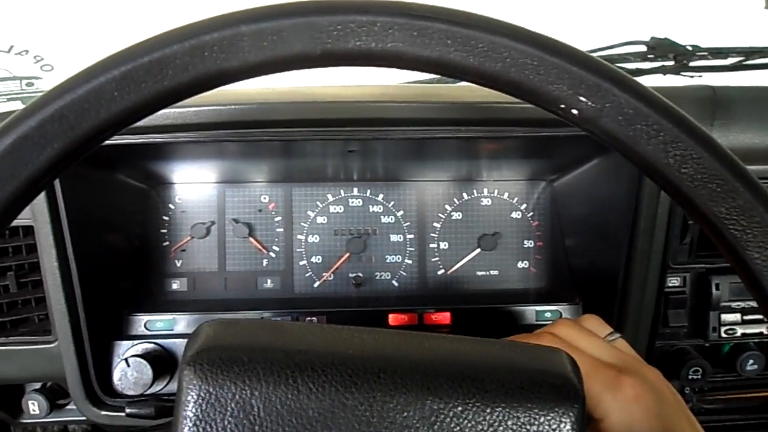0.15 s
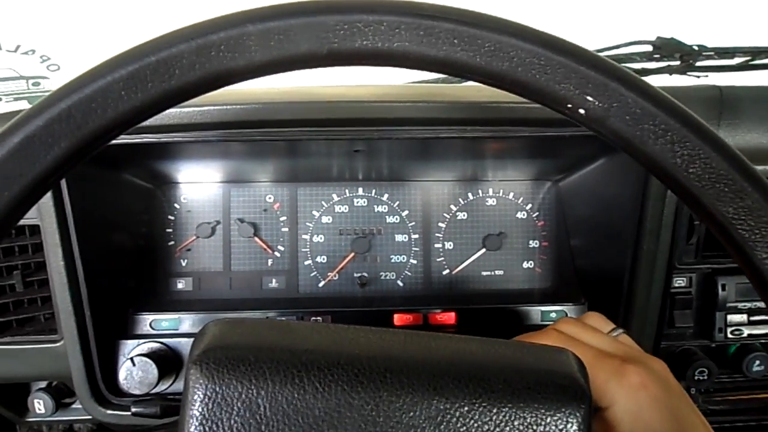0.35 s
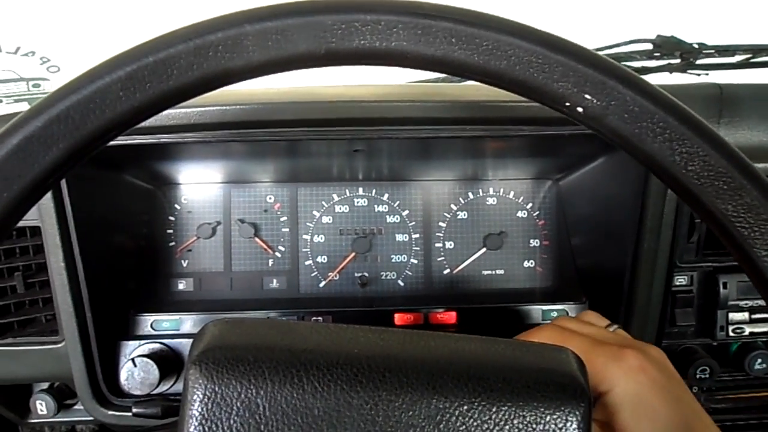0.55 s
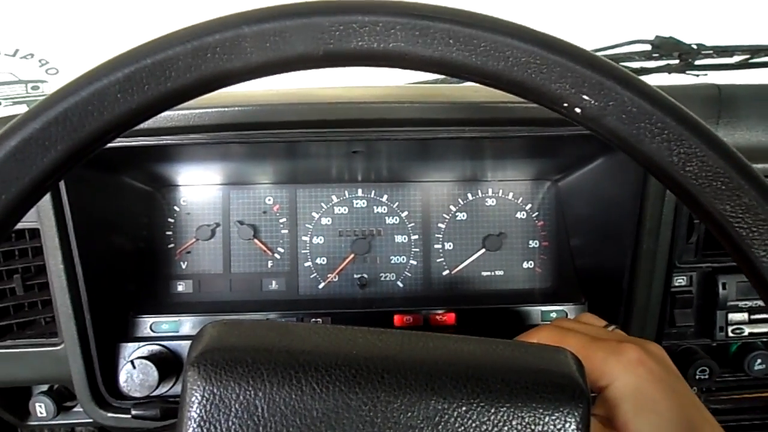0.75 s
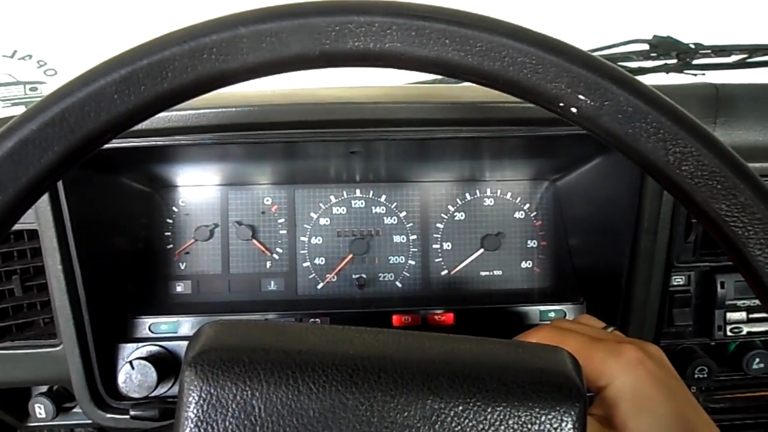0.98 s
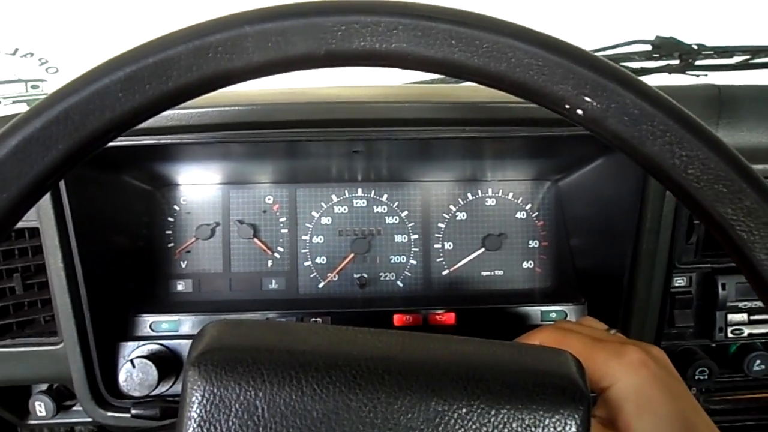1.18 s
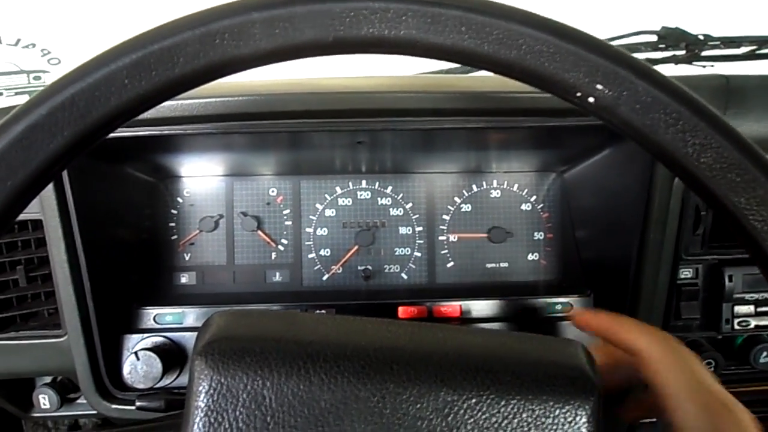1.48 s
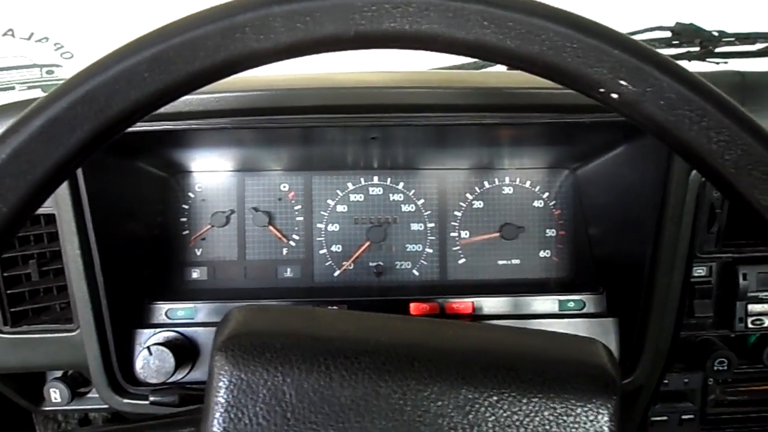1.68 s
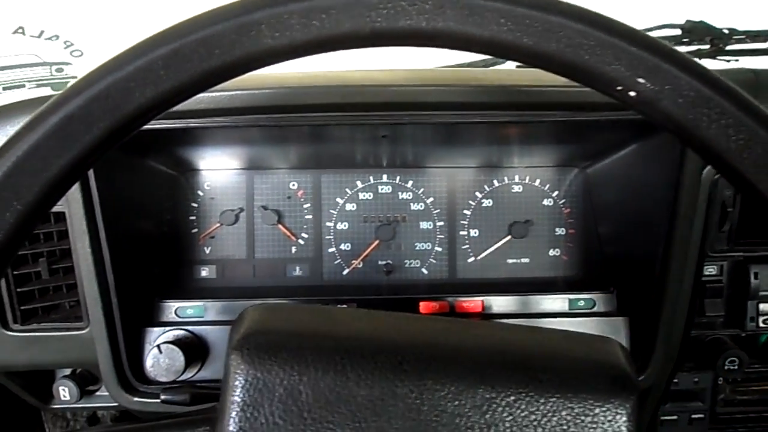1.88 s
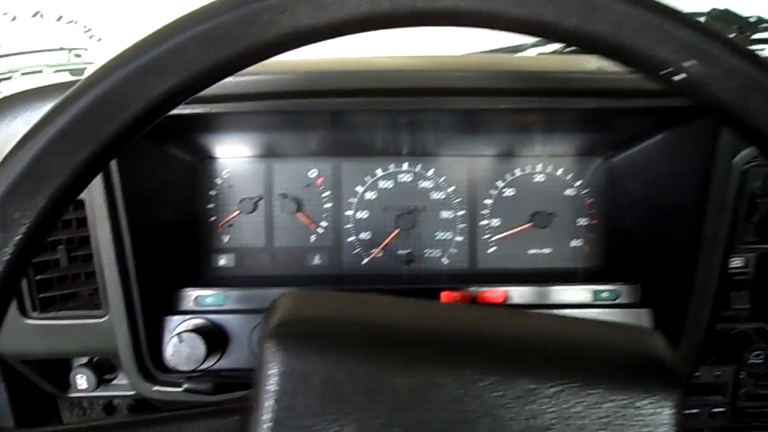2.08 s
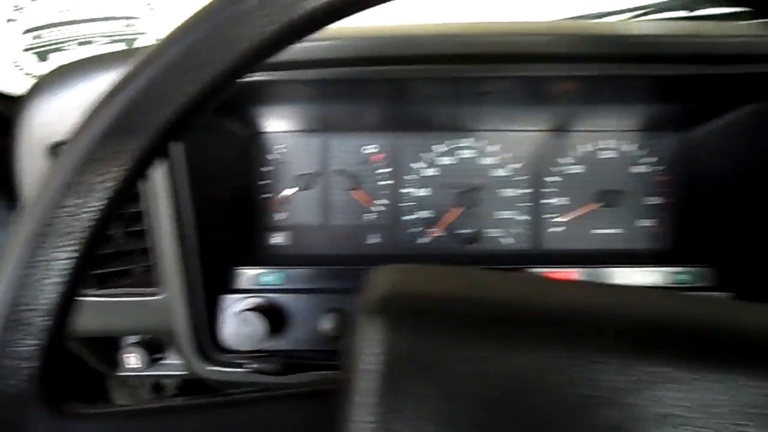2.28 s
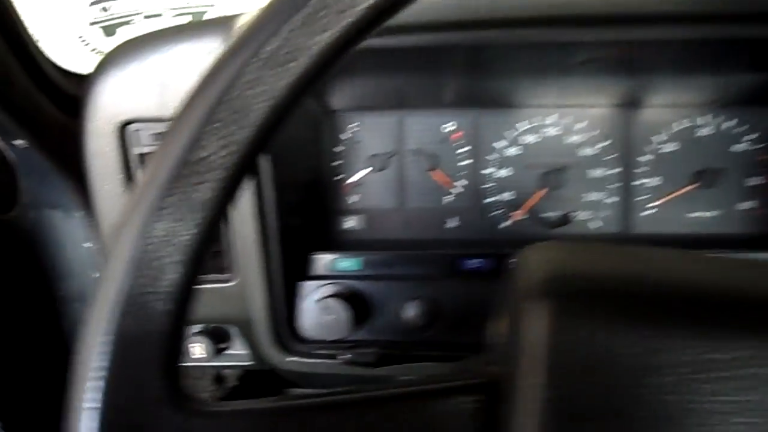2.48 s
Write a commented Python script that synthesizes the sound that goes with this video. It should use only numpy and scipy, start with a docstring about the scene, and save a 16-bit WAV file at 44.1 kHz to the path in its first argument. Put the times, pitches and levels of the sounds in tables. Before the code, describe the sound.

Loud open-exhaust car engine start from the driver's seat: key click, starter grind, deep rumbling roar

```python
"""A big six-cylinder engine with no exhaust is started, heard from the driver's seat.
A hand stirs and the key clicks (coloured noise); a pump whines (narrow bands of noise); the starter
slams in and grinds (noise gated by gear teeth, ringing the flywheel), a solenoid clacks, the motor groans
(a sagging sine). The engine catches with a roar: firing impulses excite the boom of the cabin, and gas
hisses in puffs. It settles into a booming idle that surges twice, each time with a rush of gas."""
import sys
import numpy as np
from scipy import signal
from scipy.fft import rfft, irfft
from scipy.io import wavfile
from scipy.ndimage import uniform_filter1d

SR = 44100
rng = np.random.default_rng(int(sys.argv[2]) if len(sys.argv) > 2 else 0)


def store_pcm(level_fs):
    """Save levels as 16-bit WAV."""
    pcm = np.round(np.clip(level_fs, -1, 1) * 32767).astype(np.int16)
    wavfile.write(sys.argv[1], SR, np.atleast_2d(pcm).T)


N = 116865
t = np.arange(N) / SR


def amp(db):
    """Logarithmic level: decibels to amplitude gain."""
    return 10 ** (np.asarray(db) / 20)


def unit(x):
    """Normalisation: scale to rms 1."""
    return x / np.sqrt(np.mean(x ** 2))


def curve(table, axis=1):
    """Linear interpolation: one column of a table against time."""
    rows = np.array(table, float)
    return np.interp(t, rows[:, 0], rows[:, axis])


def fader(table, axis=1):
    """Envelope: gain from a level column, opening over the 10 ms before its first row."""
    opening = np.clip((t - table[0][0]) * 100 + 1, 0, 1)
    return amp(curve(table, axis=axis)) * opening


def noise():
    """White noise: equal mean power at all frequencies."""
    return rng.standard_normal(N)


def walk(hz):
    """Low-pass chance: noise averaged twice over 1/hz seconds, at rms 1."""
    size = max(int(SR / hz), 1)
    once = uniform_filter1d(noise(), size, mode="wrap")
    return unit(uniform_filter1d(once, size, mode="wrap"))


def colour(x, points):
    """Spectral shaping: weight each frequency, falling off below the first point, at rms 1."""
    hz, db = np.array(points, float).T
    f = np.maximum(np.fft.rfftfreq(N, 1 / SR), 1)
    gain = amp(np.interp(np.log(f), np.log(hz), db))
    bass_cut = np.minimum(f / hz[0], 1) ** 2
    return unit(irfft(rfft(x) * gain * bass_cut, N))


def ring(x, modes):
    """Modal superposition: a sum of second-order resonances."""
    return sum(amp(db) * signal.lfilter(*signal.iirpeak(hz, hz / width, SR), x) for hz, width, db in modes)


def smear(x, decay_s):
    """Exponential relaxation: each impulse becomes a puff that dies away."""
    return signal.lfilter([1], [1, -np.exp(-1 / (decay_s * SR))], x)


# engine speed: t/s, firing rate/(1/s)
FIRING_RATE = [(1.16,34.6),(1.3,35),(1.35,51.5),(1.44,51.5),(1.55,66),(1.64,64.3),(1.81,70.4),(1.95,54.6),(2.13,70),(2.22,65.3),(2.3,67),(2.39,57),(2.5,84),(2.65,64)]
# force of the firings: t/s, level/dB, lead of one cylinder bank over the other/dB
FIRING_FORCE = [(1.16,-25,1),(1.2,-18.5,-5),(1.34,-7.5,10.5),(1.42,-15.5,-13.5),(1.52,-26,13),(1.64,-20.5,-0.5),(1.8,-28,12.5),(1.98,-20,15),(2.09,-22,-1.5),(2.19,-26.5,6),(2.29,-29.5,17),(2.38,-22.5,21),(2.46,-24,5.5),(2.54,-23,6),(2.65,-24.5,9)]
FIRING_SCATTER_DB, TIMING_SCATTER_S = 2.9, 0.0011


def firings():
    """Pulse train: one impulse per firing; the two banks alternate, unevenly under load."""
    rate = curve(FIRING_RATE)
    turns = np.cumsum(rate * (t > FIRING_RATE[0][0])) / SR
    at = np.flatnonzero(np.diff(np.ceil(turns)) > 0)
    chance = rng.standard_normal((len(at), 2))
    bank_db = (-1) ** np.arange(len(at)) * curve(FIRING_FORCE, axis=2)[at] / 2
    size = amp(bank_db + FIRING_SCATTER_DB * chance[:, 0])
    shift = (TIMING_SCATTER_S * SR * chance[:, 1]).astype(int)
    return np.bincount(np.clip(at + shift, 0, N - 1), size, N)


# boom resonances of the cabin: f/Hz, bandwidth/Hz, relative level/dB
CABIN_MODES = [(29.8,10,-3),(58,36,4),(97.3,9,0.5),(140,37,-31.5),(220,43,-12.5),(363,27,-18)]
# gas from the open ports: t/s, hiss level/dB, roar level/dB (before the trims below)
GAS_FLOW = [(1.06,-80,-40),(1.085,-32,-51.5),(1.16,-34,-45),(1.21,-23,-33),(1.32,-26.5,-34),(1.4,-31,-37),(1.49,-43,-45),(1.62,-51.5,-50.5),(1.84,-61,-57.5),(1.86,-46,-52),(2.0,-37.5,-43),(2.14,-55,-52.5),(2.255,-57.5,-52.5),(2.277,-41.5,-52.5),(2.4,-36,-41),(2.5,-46,-48.5),(2.63,-56.5,-51)]
# spectrum of the gas hiss: f/Hz, relative level/dB
HISS_SPECTRUM = [(300,-16),(900,-1.5),(1500,-3),(2100,0),(2600,0),(3300,1),(3850,-1.5),(4400,-3),(5200,-2),(6200,0),(7300,-3),(9000,-4),(11000,-3),(13500,-8.5),(15500,-20)]
# spectrum of the gas roar, also of the rustle before the start: f/Hz, relative level/dB
ROAR_SPECTRUM = [(60,8),(130,9.5),(230,5),(320,-1),(380,7.5),(455,-1.5),(540,-2),(660,1),(760,-0.5),(850,1.5),(1000,-5.5),(1400,-6.5),(1900,-7.5),(2500,-11),(5000,-17),(11000,-28),(15500,-34)]
PUSH_S, BODY_LOW_HZ, BOOM_DB, RUMBLE_DB = 0.0033, 34, -0.5, -14
PUFF_S, ROAR_PUFF_DEPTH, HISS_PUFF_DEPTH = 0.011, 0.4, 0.2
ROAR_DB, HISS_DB, CRACKLE_DB, FLUTTER_DB = 6.5, -1, -0.5, 1.75


def engine():
    """Forced resonance and modulated turbulence: firings boom, gas puffs. Returns bass and gas."""
    pulses = firings()
    boom = ring(smear(smear(pulses, PUSH_S), PUSH_S), CABIN_MODES)
    boom = signal.sosfilt(signal.butter(2, BODY_LOW_HZ, "high", fs=SR, output="sos"), boom)
    # rms 1 over the running time only
    boom = unit(boom) * np.sqrt(np.mean(t > FIRING_RATE[0][0]))
    rumble = amp(RUMBLE_DB) * unit(ring(smear(noise(), PUSH_S), CABIN_MODES))
    bass = (boom + rumble) * fader(FIRING_FORCE) * amp(BOOM_DB)

    puff = smear(pulses, PUFF_S)
    roar = colour(noise() * (1 + ROAR_PUFF_DEPTH * puff), ROAR_SPECTRUM) * fader(GAS_FLOW, axis=2)
    crackle = amp(CRACKLE_DB * walk(1500))
    hiss = colour(noise() * (1 + HISS_PUFF_DEPTH * puff) * crackle, HISS_SPECTRUM) * fader(GAS_FLOW)
    flutter = amp(FLUTTER_DB * walk(49))
    return bass, amp(ROAR_DB) * roar + amp(HISS_DB) * hiss * flutter


# spectrum of the pinion's slam: f/Hz, relative level/dB
SLAM_SPECTRUM = [(24, -20), (40, -7), (126, -3), (197, -22), (317, -4), (438, -19), (548, -12.5),
                 (1100, -21.5), (1190, -9.5), (1380, -25), (2060, -17.5), (2710, -26), (7910, -27.5),
                 (10700, -24.5), (15500, -36)]
# spectrum of the grinding teeth: f/Hz, relative level/dB
GRIND_SPECTRUM = [(18, -32), (30, -12), (59, 0.5), (92, -14), (140, -10), (455, -20.5), (546, -19),
                  (996, -27), (2130, -27), (2360, -31.5), (2910, -26), (6720, -33.5), (15500, -52)]
# ring of starter gear and flywheel: f/Hz, bandwidth/Hz, relative level/dB
GEAR_MODES = [(1235,48,5.5),(2040,98,-4.5),(2860,74,-6),(3250,160,-7),(3560,270,1),(6350,400,-5.5),(7100,220,-18)]
# envelope of the cranking, for grind and gear whine: t/s, level/dB (before each trim)
CRANKING = [(.67,-99),(.7,-35),(.8,-30.5),(.86,-37),(.93,-34.5),(1.03,-43),(1.12,-38),(1.2,-51),(1.28,-75)]
# envelope of the rasp as the engine overruns the gear: t/s, level/dB (before its trim)
OVERRUN_LEVEL = [(1.07,-56),(1.09,-33),(1.16,-30),(1.2,-24.5),(1.32,-30),(1.42,-40),(1.5,-43.5)]
# broad resonances of that rasp: f/Hz, bandwidth/Hz, relative level/dB
RASP_MODES = [(1433,170,-11),(1995,200,-19),(2300,280,3.5),(3130,870,-19),(3650,1500,-2.5),(5000,1600,-15)]
SLAM_S, SLAM_ATTACK_S, SLAM_HOLD_S, SLAM_DECAY_S = 0.6746, 0.047, 0.023, 0.048
SLAM_DB, GRIND_DB, GEAR_DB, RASP_DB = -25, 2.5, -6.5, -2
# mean tooth rate; fade of each scrape as a share of a tooth period; unevenness
TEETH_HZ, TOOTH_DECAY, TOOTH_SCATTER_DB = 258.6, 1, 1.2


def starter():
    """Periodic excitation: the pinion slams in, teeth grind and ring the flywheel, then rasp in overrun."""
    age = t - SLAM_S
    rise = np.clip(age / SLAM_ATTACK_S, 0, 1)
    fall = np.exp(-np.maximum(age - SLAM_ATTACK_S - SLAM_HOLD_S, 0) / SLAM_DECAY_S)
    mesh = np.cumsum(TEETH_HZ * (1 + .15 * walk(40))) / SR
    teeth = np.exp(-(mesh % 1) / TOOTH_DECAY) * amp(TOOTH_SCATTER_DB * walk(190))
    slam = amp(SLAM_DB) * rise * fall * colour(noise() * teeth, SLAM_SPECTRUM)
    grind = amp(GRIND_DB) * colour(noise() * teeth, GRIND_SPECTRUM)
    gear = amp(GEAR_DB) * unit(ring(noise() * teeth, GEAR_MODES))
    rasp = amp(RASP_DB) * unit(ring(noise() * teeth, RASP_MODES))
    rasp = rasp * fader(OVERRUN_LEVEL) * (t < OVERRUN_LEVEL[-1][0])
    return slam + (grind + gear) * fader(CRANKING) + rasp


# groan of the motor, sagging against compression: t/s, f/Hz, level/dB
MOTOR_GROAN = [(.88,377,-49),(.925,311.7,-50),(.962,211,-36),(.995,151.5,-31),(1.03,135,-27),(1.065,145,-40.5),(1.11,130.5,-49),(1.15,126,-34.5),(1.2,126,-52)]
GROAN_WAVER_DB = 4.5
THUMP_S, THUMP_HZ, THUMP_DECAY_S, THUMP_DB = .699, 125, .014, -15


def starter_motor():
    """Damped and forced oscillation: the motor jolts the body, then groans against compression."""
    phase = 2 * np.pi * np.cumsum(curve(MOTOR_GROAN) * (1 + 0.0342 * walk(69))) / SR
    groan = np.sqrt(2) * np.sin(phase) * fader(MOTOR_GROAN, axis=2)
    groan = groan * amp(GROAN_WAVER_DB * walk(41)) * (t < MOTOR_GROAN[-1][0])
    since = np.maximum(t - THUMP_S, 0)
    thump = amp(THUMP_DB) * np.sin(2 * np.pi * THUMP_HZ * since) * np.exp(-since / THUMP_DECAY_S)
    return groan - thump


WHINE_HZ, WHINE_DB, WHINE_WAVER = 2120, -8, .008  # waver as a share of the frequency


def gear_whine():
    """Frequency modulation: the meshing gears sing one wavering tone during cranking."""
    phase = 2 * np.pi * np.cumsum(WHINE_HZ * (1 + WHINE_WAVER * walk(39))) / SR
    level = amp(WHINE_DB + 2 * walk(52)) * fader(CRANKING) * (t < CRANKING[-1][0])
    return np.sqrt(2) * np.sin(phase) * level


# contact of the starter solenoid: f/Hz, bandwidth/Hz, relative level/dB
SOLENOID_MODES = [(545,70,10),(770,70,2),(2100,160,-26),(4760,2200,-10)]
SOLENOID_S, SOLENOID_DECAY_S, SOLENOID_DB = 0.74, 0.0097, -37.5


def solenoid():
    """Impact: the solenoid contact clacks, as resonant noise that decays exponentially."""
    blow = (t >= SOLENOID_S) * np.exp(-np.abs(t - SOLENOID_S) / SOLENOID_DECAY_S)
    return amp(SOLENOID_DB) * unit(ring(noise(), SOLENOID_MODES)) * blow


# stirring before the start: t/s, rustle level/dB, bumping level/dB
STIRRING = [(0,-66,-54),(.19,-65,-59),(.24,-58.5,-86),(.37,-60,-44),(.5,-61,-53),(.545,-50.5,-47),(.62,-53.5,-73),(.69,-55,-66),(.75,-70,-70)]
# spectrum of the low bumping: f/Hz, relative level/dB
BUMP_SPECTRUM = [(30,-3.5),(50,9),(75,0.5),(150,-33),(600,-60)]
# key and switch clicks: t/s, level/dB, decay/s, treble lift/(dB per decade)
KEY_CLICKS = [(.018,-45,0.0085,-12),(0.027,-45,0.0054,-6),(.519,-53,0.0059,35),(0.538,-45,0.0053,18)]
# spectrum of a click before its treble lift: f/Hz, relative level/dB
KEY_SPECTRUM = [(200,-23),(800,-9),(1250,12),(1700,0),(2200,2.5),(3500,-7),(5000,-1.5),(8000,-7.5),(12000,-10),(15500,-24)]
# whine of the fuel pump: f/Hz, level/dB (before its trim)
PUMP_TONES = [(3052,-69.5),(3607,-69),(3900,-74),(5076,-76),(5755,-74),(7499,-70),(10200,-73),(13000,-76)]
PUMP_ON_S, PUMP_RISE_S, PUMP_FADE_S, PUMP_WIDTH_HZ, PUMP_DB = 0.582, 0.036, .12, 170, 10.5


def ignition():
    """Shaped noise: a hand stirs, the key clicks through its positions, the fuel pump whines briefly."""
    rustle = colour(noise(), ROAR_SPECTRUM) * fader(STIRRING)
    bumping = colour(noise(), BUMP_SPECTRUM) * fader(STIRRING, axis=2)
    out = (rustle + bumping) * (t < STIRRING[-1][0])
    for start, db, decay, lift_db in KEY_CLICKS:
        tone = [(hz, level + lift_db * np.log10(hz / 1000)) for hz, level in KEY_SPECTRUM]
        decaying = (t >= start) * np.exp(-np.abs(t - start) / decay)
        out = out + amp(db) * colour(noise(), tone) * decaying
    whine = sum(amp(db + PUMP_DB) * unit(ring(noise(), [(hz, PUMP_WIDTH_HZ, 0)])) for hz, db in PUMP_TONES)
    age = np.maximum(t - PUMP_ON_S, 0)
    return out + whine * np.minimum(age / PUMP_RISE_S, 1) * np.exp(-age / PUMP_FADE_S)


CABIN_DB, CABIN_DECAY_S = -10, 0.021


def cabin(x):
    """Reverberation: dense, quickly dying reflections from glass and dashboard, weak in the bass."""
    age = t[:SR // 10]
    tail = rng.standard_normal(len(age)) * np.exp(-age / CABIN_DECAY_S)
    tail = signal.sosfilt(signal.butter(2, 300, "high", fs=SR, output="sos"), tail)
    tail *= amp(CABIN_DB) / np.linalg.norm(tail)
    return (x + signal.fftconvolve(x, tail)[:N]) / np.hypot(1, amp(CABIN_DB))


# spectrum of the steady background: f/Hz, relative level/dB
QUIET_SPECTRUM = [(15, -68), (25, -1.5), (59, -12.5), (77, -19), (140, -17), (227, -32), (359, -25.5),
                  (598, -44), (648, -82), (826, -45), (15500, -49.5)]
QUIET_DB = -55


def background():
    """Stationary noise: a faint, mostly low bed under the whole scene."""
    return amp(QUIET_DB) * colour(noise(), QUIET_SPECTRUM)


def scene():
    """Superposition: everything meets at one microphone in the cabin."""
    bass, gas = engine()
    clatter = cabin(gas + starter() + solenoid() + ignition())
    mono = bass + starter_motor() + gear_whine() + clatter + background()
    return np.array([mono, mono])


TOP_HZ = 15600


def record(dry):
    """Band limiting: the recorder cuts the top with a steep low-pass filter."""
    return signal.sosfilt(signal.ellip(10, .2, 80, TOP_HZ, fs=SR, output="sos"), dry)


dry = scene()
out = record(dry)
store_pcm(out)
```